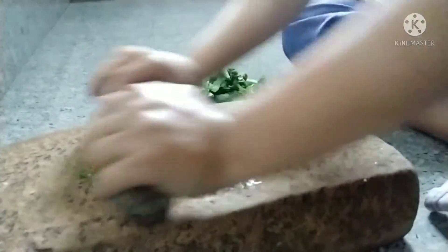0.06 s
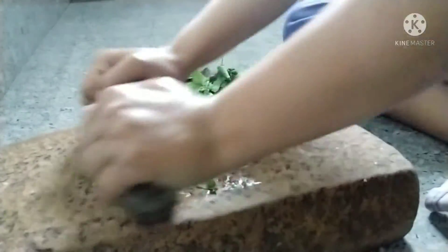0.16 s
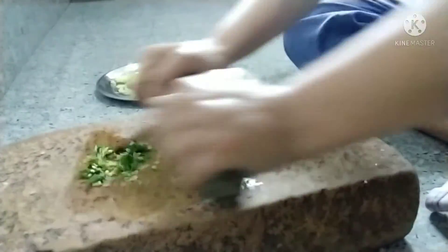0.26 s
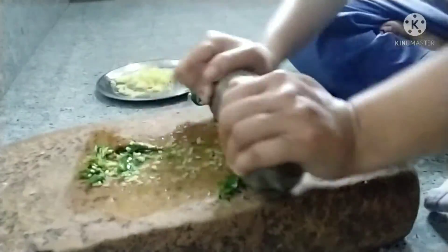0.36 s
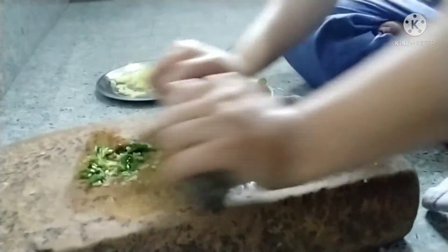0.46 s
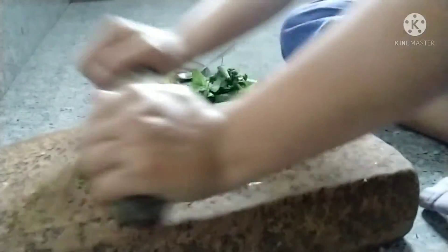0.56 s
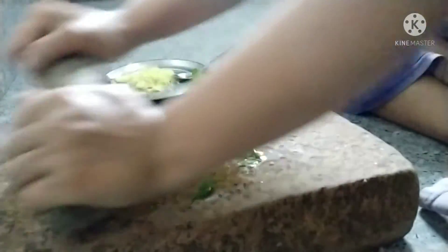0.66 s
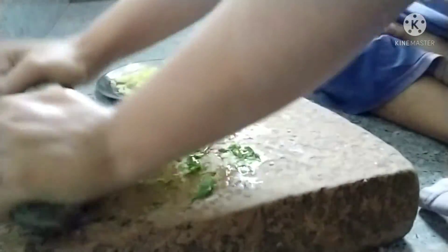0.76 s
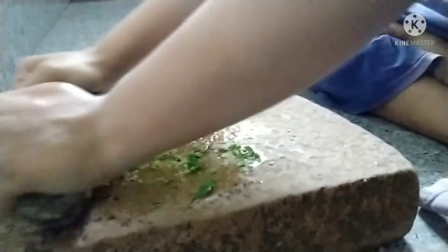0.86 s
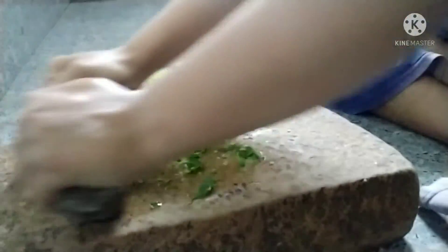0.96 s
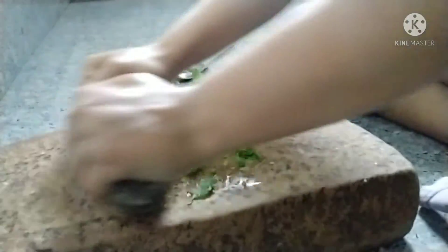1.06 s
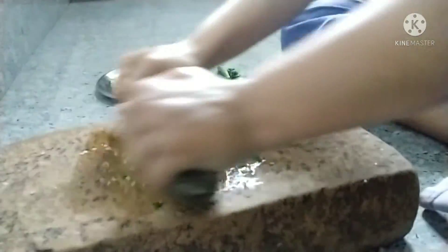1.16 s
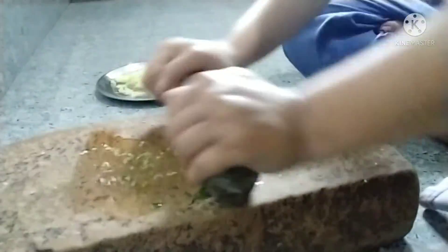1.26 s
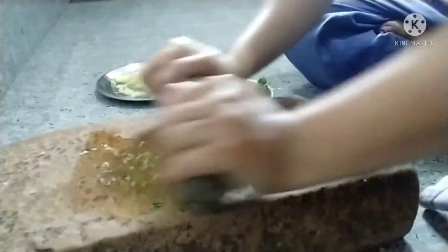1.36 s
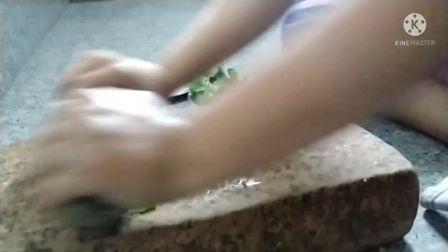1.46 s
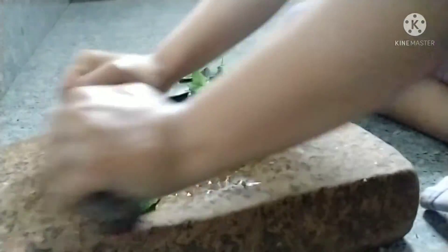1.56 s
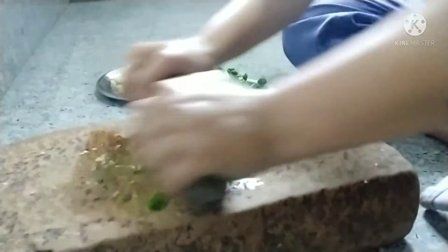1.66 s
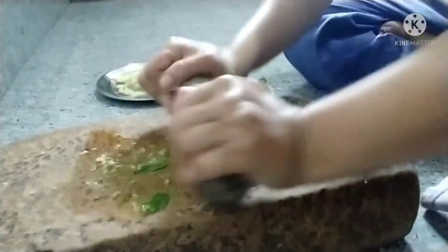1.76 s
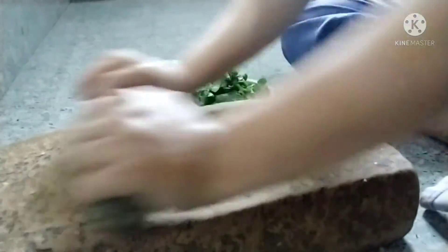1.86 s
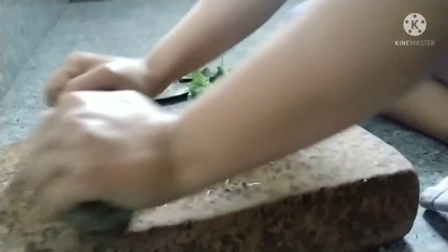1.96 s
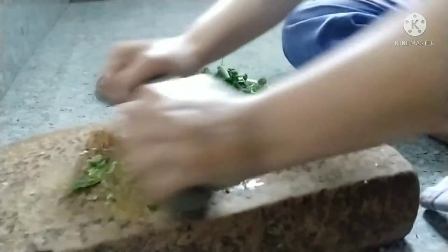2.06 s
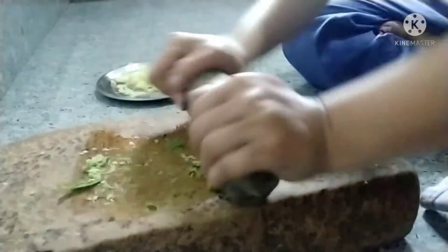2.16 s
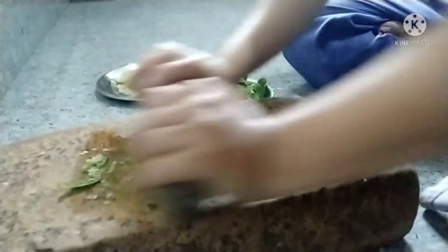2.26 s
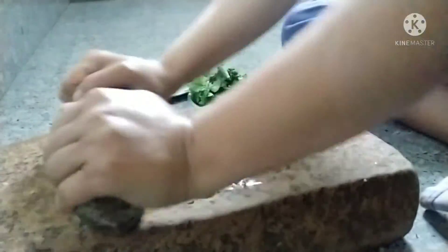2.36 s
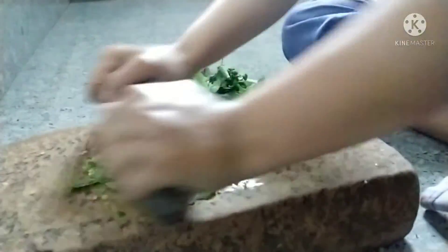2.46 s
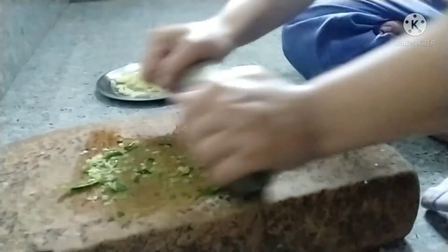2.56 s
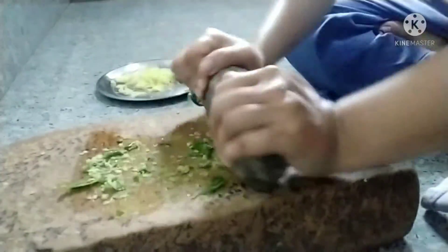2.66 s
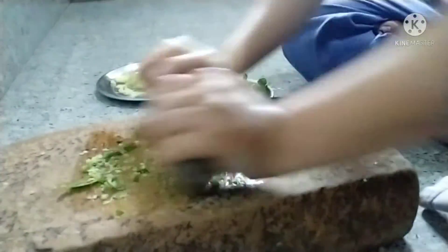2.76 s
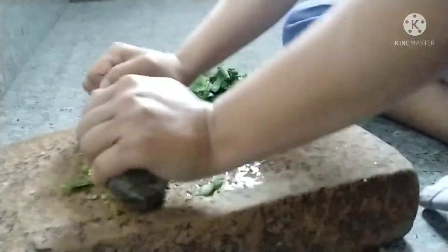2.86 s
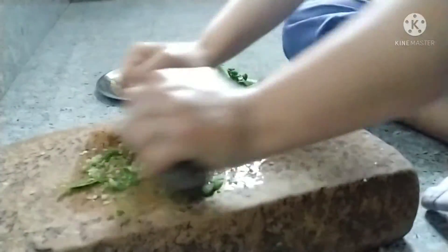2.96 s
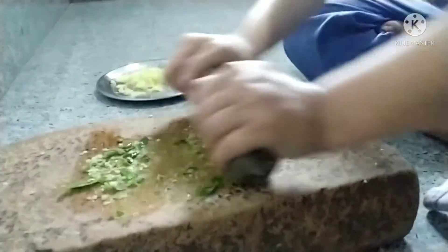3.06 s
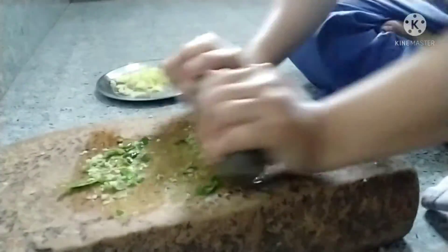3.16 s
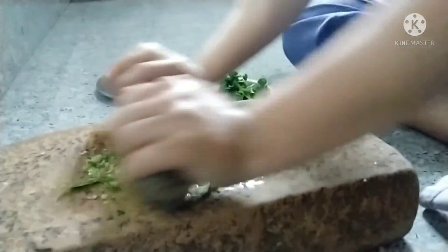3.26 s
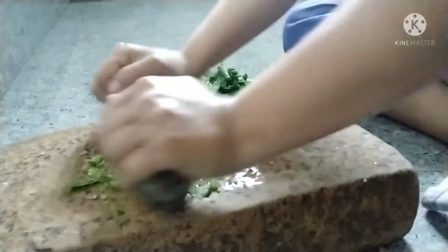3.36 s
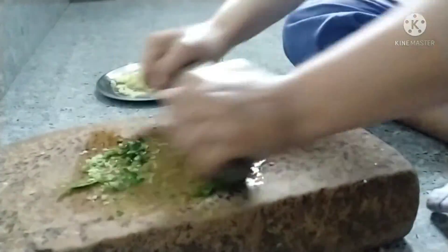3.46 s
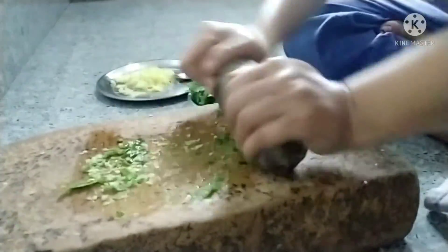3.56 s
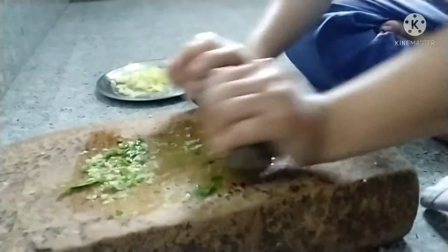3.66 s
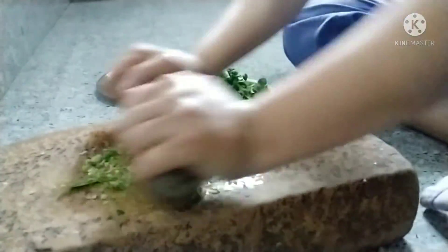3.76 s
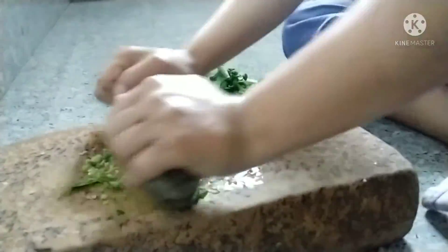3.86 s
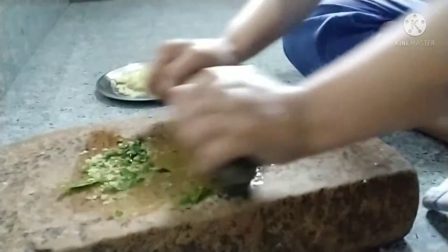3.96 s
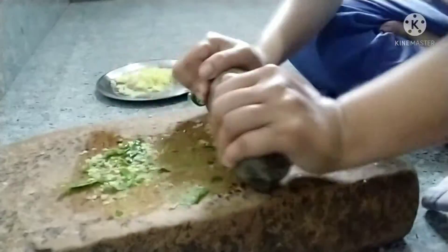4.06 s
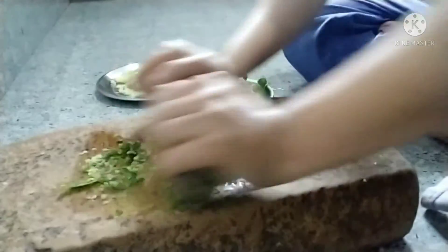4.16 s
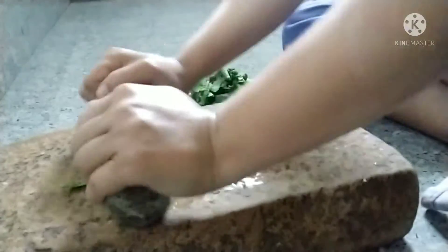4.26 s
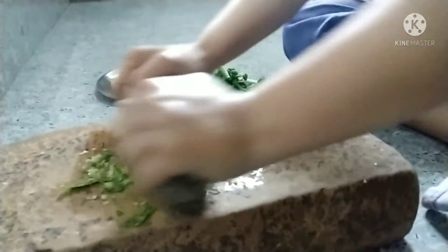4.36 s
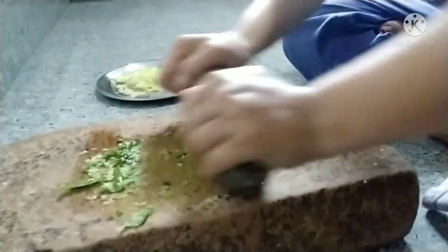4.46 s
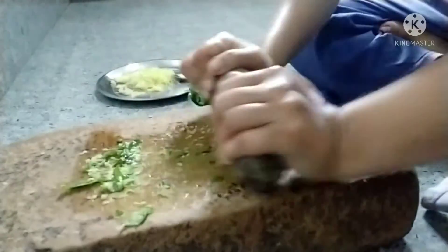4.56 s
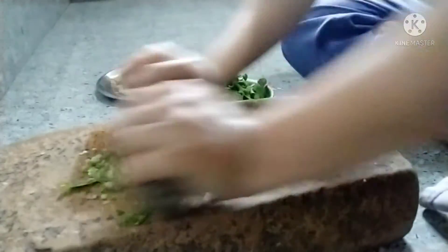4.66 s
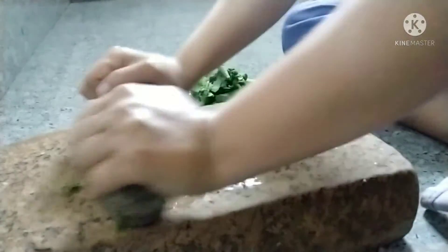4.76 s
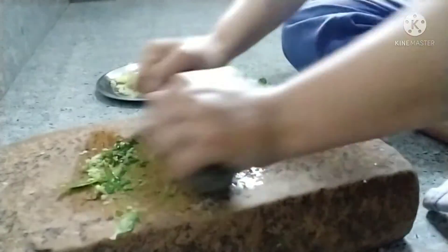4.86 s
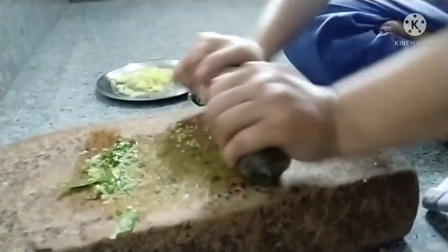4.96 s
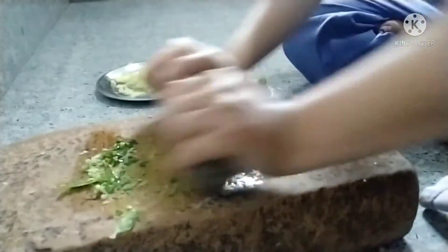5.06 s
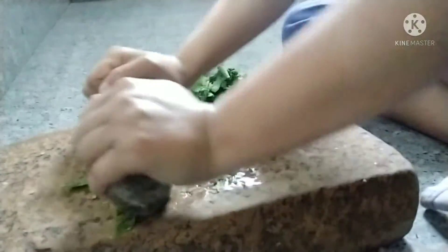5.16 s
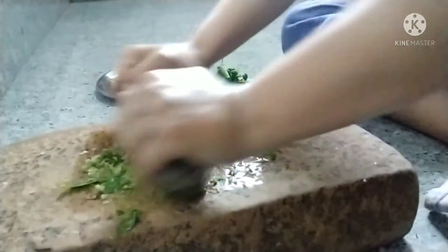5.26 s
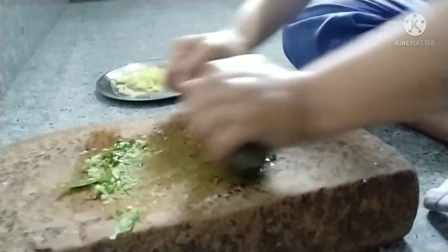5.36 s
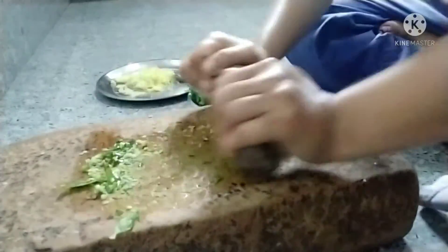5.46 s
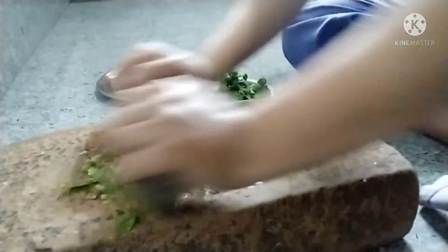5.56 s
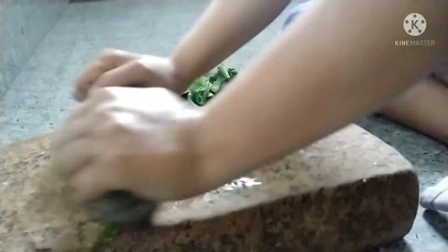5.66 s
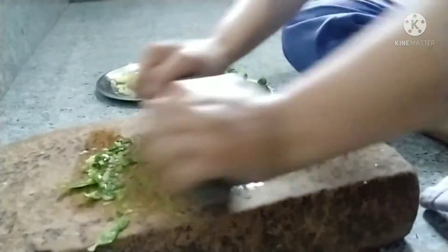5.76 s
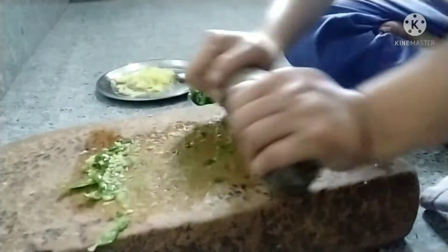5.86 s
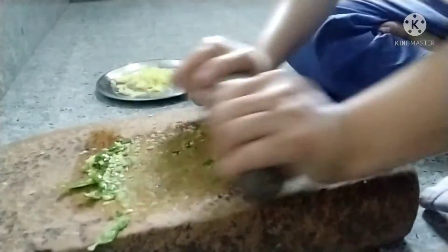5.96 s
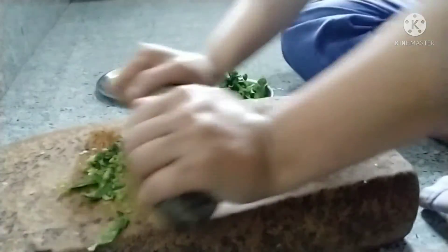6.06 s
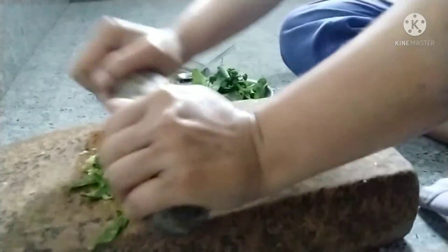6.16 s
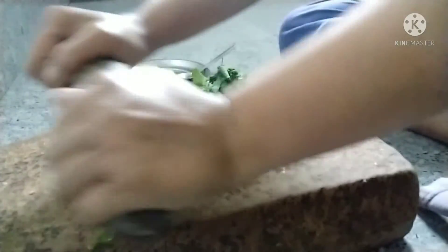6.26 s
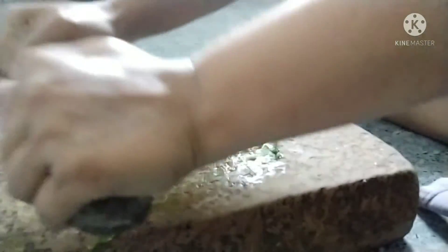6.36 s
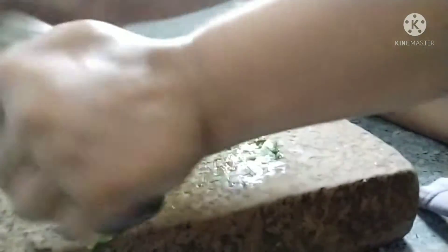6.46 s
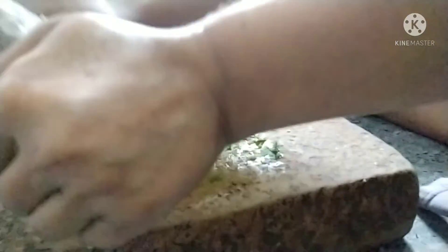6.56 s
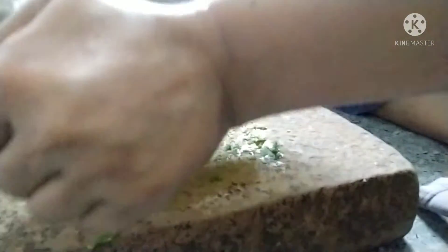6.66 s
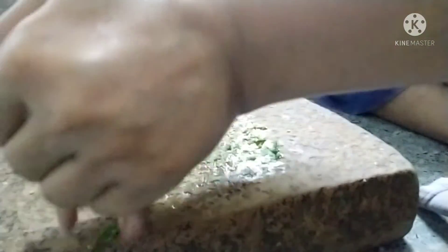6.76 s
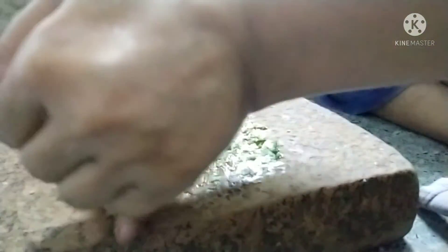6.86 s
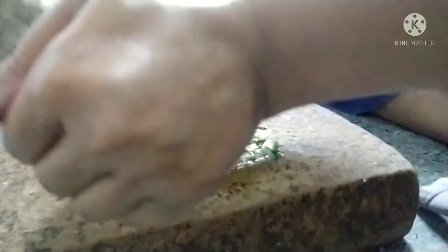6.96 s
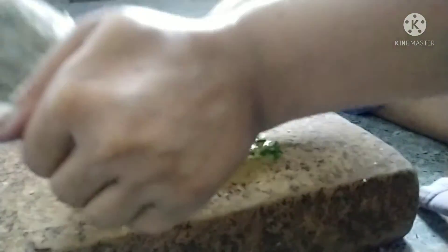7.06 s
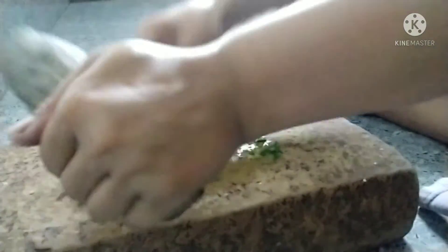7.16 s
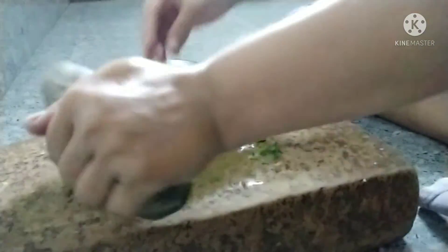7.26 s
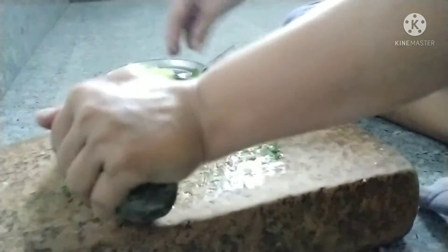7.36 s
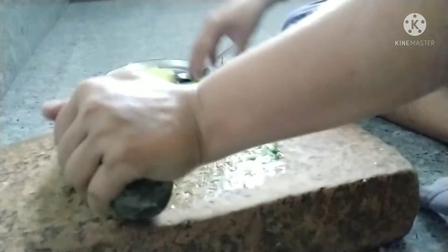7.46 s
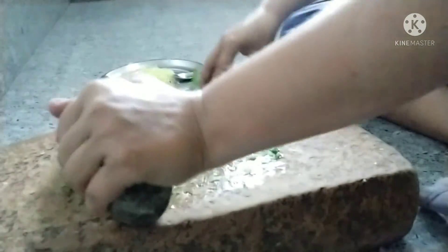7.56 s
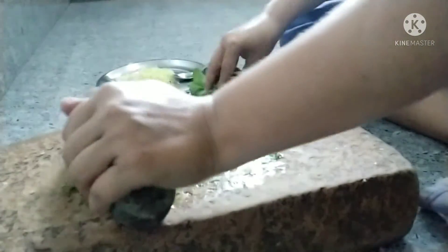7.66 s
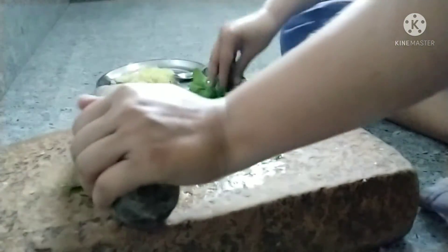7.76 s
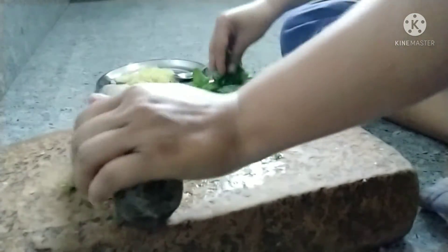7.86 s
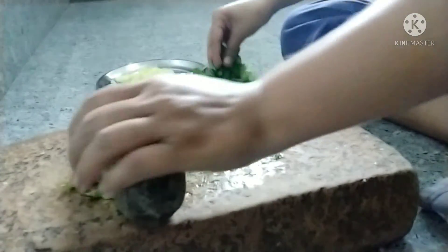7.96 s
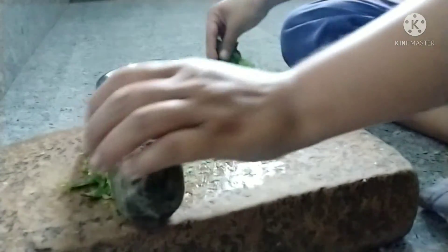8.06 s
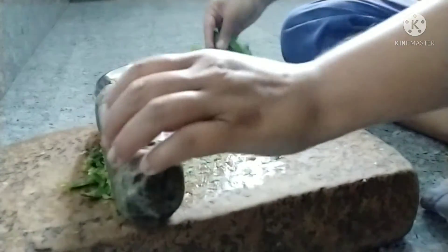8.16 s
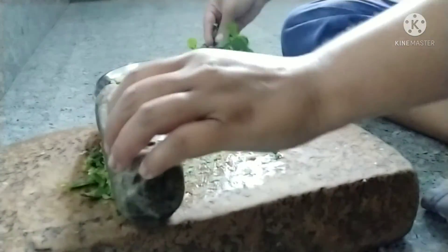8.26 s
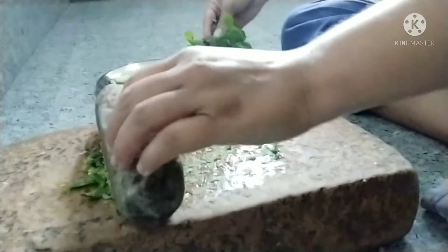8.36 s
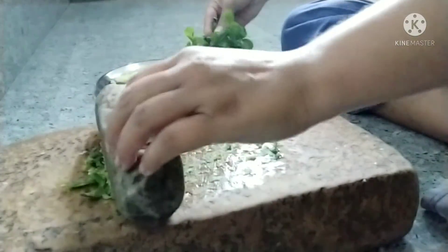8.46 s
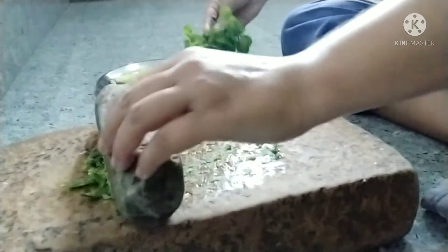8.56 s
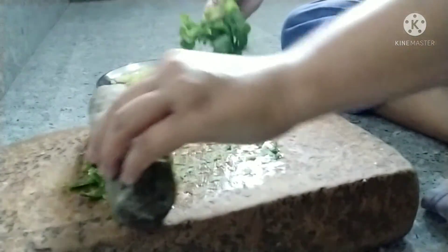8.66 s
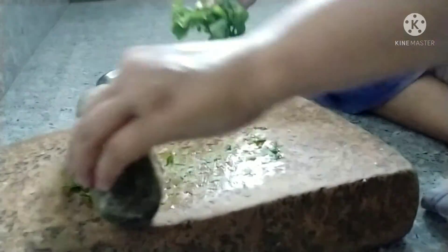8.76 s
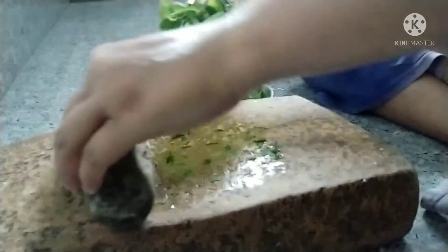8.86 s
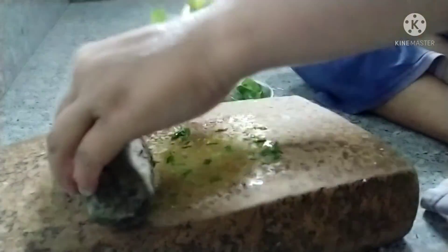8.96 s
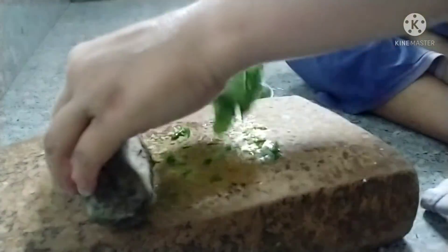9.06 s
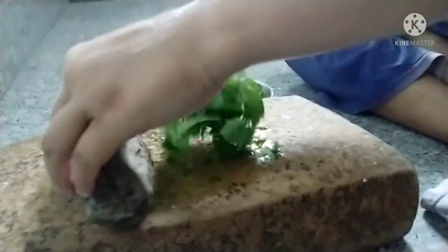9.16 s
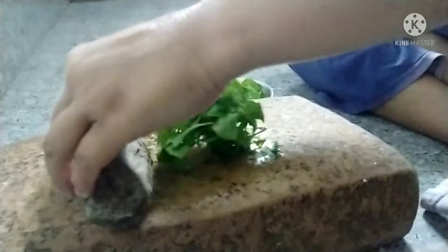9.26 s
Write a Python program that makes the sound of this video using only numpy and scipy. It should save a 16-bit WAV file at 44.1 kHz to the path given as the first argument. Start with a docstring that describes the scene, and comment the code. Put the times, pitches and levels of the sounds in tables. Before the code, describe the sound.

Close to the microphone in a small hard room, a heavy stone roller rubs back and forth over a gritty slab. Strokes come about twice a second, with clacking knocks, low hollow booms and a wet, bright fizz of crushed herbs. After about six seconds the roller rocks to rest in quickening soft taps, then leaves rustle faintly. A deep motor hum runs throughout.

```python
"""Grinding herbs on a stone slab

Wet herbs are ground on a stone slab on the floor of a small hard room, close to the microphone.
Grit and knocks ring the roller's modes, bumps and tips boom the slab, squeezed paste fizzes in random clicks.
The roller rocks to rest in soft taps and fresh leaves are picked up. A motor hums throughout."""
import sys
import numpy as np
from scipy import signal
from scipy.fft import rfft, irfft
from scipy.io import wavfile

SR = 44100
rng = np.random.default_rng(int(sys.argv[2]) if len(sys.argv) > 2 else 0)


def store_pcm(level_fs):
    """Save levels as 16-bit WAV."""
    pcm = np.round(np.clip(level_fs, -1, 1) * 32767).astype(np.int16)
    wavfile.write(sys.argv[1], SR, np.atleast_2d(pcm).T)


N = 411453
TIME = np.arange(N) / SR

# roller knocks on the slab: t/s, level/dB, bright ring re knock/dB, clack re knock/dB
KNOCKS = [(0.032, -15, -11, -18), (0.067, -15, 6.5, 9.5), (0.371, -34.5, 8, 1), (0.512, -12, -5, 1),
          (0.833, -6, -5, 2.5), (0.894, -18, -6, 10), (1.011, -22.5, -20, -3), (1.089, -25, -15.5, -19.5),
          (1.516, -21.5, 0, -9), (1.593, -15, 1.5, -12), (1.754, -13, 4.5, 0), (1.793, -14.5, 1.5, 1.5),
          (2.175, -29, 7, 0), (2.248, -26, -5, -8), (2.603, -29.5, 3, 6), (2.708, -16, -3, -5),
          (2.74, -30, -13, -11), (2.824, -20.5, 3, -16), (3.257, -21, -6, -7), (3.327, -18, -7, -2),
          (3.559, -21, 7.5, -9), (3.619, -17.5, 2, 0), (3.764, -17.5, 0, -8), (3.899, -26.5, 3, 1),
          (4.085, -22.5, 0.5, -2), (4.497, -30.5, 3, -3), (4.52, -27, 2, 1), (4.554, -24, 5, 3),
          (4.569, -25, 4, -7), (4.713, -29, -16, -14), (4.747, -29, -9, -14), (4.957, -24, -4, -13),
          (5.01, -25, 2, -7), (5.131, -25.5, -9, -13), (5.168, -24, -16, -12), (5.427, -21, -6, 1),
          (5.606, -27.5, -21, -20), (5.876, -24.5, -0.5, 1), (5.921, -14.5, 4, 3), (5.951, -15, 3, -2)]
# soft taps, mostly quickening and weakening, as the roller rocks to rest: t/s, level/dB
TAPS = [(6.3119, -27.5), (6.3694, -24.5), (6.438, -26.5), (6.4974, -27.5), (6.5512, -31), (6.598, -32),
        (6.641, -31.5), (6.679, -37), (6.713, -43), (6.74, -44), (6.776, -41)]

ROLL_START_S = 6.292   # the last, free roll


def from_db(db):
    """Decibels to gain."""
    return np.exp(np.asarray(db) * (np.log(10) / 20))


def rms_one(x):
    """Scale to rms 1."""
    return x / np.sqrt(np.mean(x ** 2) + 1e-20)


def at_hz(points, hz):
    """Read a table on a log-frequency axis."""
    f, value = np.transpose(points)
    return np.interp(np.log(np.maximum(hz, 1)), np.log(f), value)


def gain(rows):
    """A dB curve as a gain per sample."""
    return from_db(np.interp(TIME, *np.transpose(rows)))


def drift(knots_per_s):
    """Random curve: straight lines between normal knots of spread 1."""
    knots = rng.standard_normal(N // 20)
    return np.interp(TIME * knots_per_s, np.arange(len(knots)), knots)


def butter(x, hz, kind, order=2):
    """Butterworth filter."""
    return signal.sosfilt(signal.butter(order, hz, kind, fs=SR, output="sos"), x + 1e-18)


def convolve(x, response):
    """Pass sound through a response, channel by channel."""
    return signal.fftconvolve(np.atleast_2d(x), np.atleast_2d(response), axes=1)[:, :N]


def colour(spectrum, size=4096):
    """Causal (minimum-phase) response with the spectrum's shape; peak sample 1."""
    level_db = at_hz(spectrum, np.fft.rfftfreq(size, 1 / SR))
    cepstrum = irfft(np.log(from_db(level_db)))
    cepstrum[1:size // 2] *= 2
    cepstrum[size // 2 + 1:] = 0
    response = irfft(np.exp(rfft(cepstrum)))
    return response / np.abs(response).max()


def grains(per_s, spread_db):
    """Random clicks of uneven size; mean power about 1 at any rate."""
    size_db = spread_db * np.minimum(rng.exponential(1, N), 4)
    sizes = rms_one(from_db(size_db)) * rng.choice([-1, 1], N)
    chance = np.clip(per_s / SR, 1 / SR, 1)
    return sizes * (rng.random(N) < chance) / np.sqrt(chance)


def blows(events, crunch, crunch_s):
    """A click per event plus a brief crumble of noise that swells and dies."""
    force, t = np.zeros(N + SR), TIME[:SR // 20]
    for s, db in events:
        crumble = rng.standard_normal(len(t)) * t * np.exp(-t / crunch_s)
        blow = crunch * crumble / np.linalg.norm(crumble)
        blow[0] += 1
        at = int(s * SR)
        force[at:at + len(t)] += from_db(db) * blow
    return force[:N]


def swell(start_s, length_s, attack_s, sag_db_per_s, release_db_per_s):
    """Gain of one movement: rounded attack, sagging hold, release; cut 2 s after its start."""
    out, near = np.zeros(N), slice(*np.searchsorted(TIME, [start_s, start_s + 2]))
    t = TIME[near] - start_s
    attack = np.sin(np.pi / 2 * np.minimum(t / attack_s, 1)) ** 2
    out[near] = attack * from_db(-sag_db_per_s * t - release_db_per_s * np.maximum(t - length_s, 0))
    return out


def ringing(modes, rubbing, hits, patchy_db, wander):
    """A body rung by rubbing and hits (one force per mode); rubbing shares and mode pitches wander."""
    t, whole = TIME[:SR], 0
    for k, (hz, db, t60) in enumerate(modes):
        whole = whole + (-1) ** k * from_db(db - 60 * t / t60) * np.sin(2 * np.pi * hz * t)
    # rubbing is scaled by the response's energy, hits by its peak
    rubbing, peak, out = rubbing / np.linalg.norm(whole), np.abs(whole).max(), 0
    for k, ((hz, db, t60), hit) in enumerate(zip(modes, hits)):
        force = rubbing * from_db(patchy_db * drift(18)) + hit / peak + 1e-18
        # shift the mode down to 0 Hz, let it decay there, shift it back
        turn = np.exp(2j * np.pi * hz / SR * np.cumsum(1 + wander * drift(14)))
        ring = signal.lfilter([1], [1, -from_db(-60 / (t60 * SR))], force * turn.conj())
        out = out + (-1) ** k * from_db(db) * (ring * turn).imag
    return out


def in_room(x, wet_db, left_db, lead_s=0., wet_left_db=0.):
    """Direct sound, louder and earlier at the left, plus a diffuse tail with its own decay per band."""
    # reverberation: f/Hz, t60/s
    room_t60 = [(200, 0.27), (400, 0.54), (750, 0.59), (1400, 0.27), (4000, 0.19), (9000, 0.17),
                (16000, 0.0083)]
    t, tail = TIME[:SR], 0
    edges, white = np.geomspace(100, 17000, 12), rng.standard_normal((2, 2, SR))
    for k, (low, high) in enumerate(zip(edges, edges[1:])):
        decay = from_db(-60 * t / at_hz(room_t60, np.sqrt(low * high)))
        tail = tail + butter(white[k % 2], [low, high], "band") * decay
    tail = tail * np.clip((t - .003) / 0.0004, 0, 1)   # starts after 3 ms
    tail /= np.linalg.norm(tail, axis=1, keepdims=True)
    x, sides = np.ravel(x), np.array([[.5], [-.5]])
    direct = np.array([x, np.roll(x, round(lead_s * SR))])
    return direct * from_db(left_db * sides) + from_db(wet_db + wet_left_db * sides) * convolve(x, tail)


def roller():
    """Juddering grit and knocks ring the same stone modes; a knock starts with a dry crack."""
    # roller against slab: f/Hz, level/dB, t60/s
    stone_modes = [(760, 1.5, 0.0069), (841.7, -14, 0.096), (1053, -3, 0.025), (1102, -1.5, 0.039),
                   (1180, -3, 0.018), (1543, -7.5, 0.03), (1645, -7, 0.025), (1677, -9.5, 0.076),
                   (1741, -0.5, 0.014), (2058, -11, 0.032), (2250, -2.5, 0.0055)]
    # band of the dry crack of stone on stone: low f/Hz, high f/Hz
    crack_hz = [1010, 2090]
    grit = from_db(-6.5) * grains(per_s=1500, spread_db=2.5) * strokes("grit", contact_db=-51) * judder()
    hits = [knocking(hz) for hz, db, t60 in stone_modes]
    stone = butter(ringing(stone_modes, grit, hits, patchy_db=1.5, wander=0.0096), 480, "high")
    cracking = blows([(s, db) for s, db, ring, clack in KNOCKS], crunch=0.55, crunch_s=0.00066)
    crack = from_db(16.5) * butter(cracking, crack_hz, "band", order=4)
    return in_room(stone, wet_db=-5.0, left_db=1.1, lead_s=0.00013) + crack


def knocking(hz):
    """Force of all knocks on one mode: the point struck sets its ring and clack; taps land softly."""
    # top of low modes, both ends of the bright ring, start of the clack: f/Hz
    ring_hz = [1250, 1550, 1670, 1950]
    hits = [(s, db + np.interp(hz, ring_hz, [0, ring, ring, clack])) for s, db, ring, clack in KNOCKS]
    # little force above the cutoffs
    hard = butter(blows(hits, crunch=.25, crunch_s=.002), 2390, "low", order=5)
    soft = butter(blows(TAPS, crunch=.15, crunch_s=.002), 1750, "low", order=7)
    return hard + soft


def judder():
    """The roller catches on a pit, then slides on: uneven sudden steps that die quickly; rms 1."""
    judders_per_s, decay_s, spread_db, floor = 55, 0.004, 4, 0.34
    gap, size = rng.standard_normal((1500, 2)).T
    starts = np.append(0, np.cumsum(from_db(3.5 * gap) / judders_per_s))
    last = np.searchsorted(starts, TIME, side="right") - 1
    return rms_one(floor + from_db(spread_db * size[last]) * np.exp((starts[last] - TIME) / decay_s))


def strokes(layer, contact_db):
    """Gain of the grit or rumble: the strongest of pushes, pulls and the contact between them."""
    # roller pushed forward: start t/s, length/s, grit level/dB, rumble level/dB
    forward = [(0.08, 0.18, -34, -31.5), (0.508, 0.37, -33, -33), (1.04, 0.24, -34.5, -33),
               (1.522, 0.11, -39, -24), (1.89, 0.36, -39, -31), (2.335, 0.26, -39.5, -30.5),
               (2.82, 0.11, -41, -25.5), (3.255, 0.084, -36, -27.5), (3.775, 0.06, -34, -22.5),
               (4.24, 0.1, -54, -35.5), (4.71, 0.11, -42.5, -30), (5.125, 0.098, -42, -29.5),
               (5.612, 0.1, -42.5, -30.5), (6.075, 0.091, -41.5, -38)]
    # drawn back over nearly bare stone: start t/s, length/s, grit level/dB, rumble level/dB
    back = [(0.0, 0.068, -25, -22), (0.335, 0.052, -42, -37), (0.715, 0.05, -35, -27),
            (0.92, 0.12, -42, -33), (1.755, 0.1, -38, -32.5), (2.18, 0.12, -32, -31.5),
            (2.595, 0.19, -33.5, -35.5), (3.07, 0.1, -47.5, -40), (3.53, 0.37, -35, -30.5),
            (4.06, 0.16, -52, -38.5), (4.49, 0.12, -37.5, -35), (4.95, 0.1, -35.5, -35),
            (5.375, 0.18, -35.5, -33), (5.87, 0.17, -32, -31.5)]
    column = 2 + ["grit", "rumble"].index(layer)
    level = contact(contact_db)
    for rows, shape in ((forward, push), (back, pull)):
        for row in rows:
            level = np.maximum(level, from_db(row[column]) * shape(row[0], row[1]))
    return level


def push(start_s, length_s):
    """Weight on the roller during a push: lands at once, then eases."""
    return swell(start_s, length_s, attack_s=0.0088, sag_db_per_s=42, release_db_per_s=42)


def pull(start_s, length_s):
    """Weight on the roller on the way back."""
    return swell(start_s, length_s, attack_s=0.016, sag_db_per_s=19, release_db_per_s=171)


def contact(db):
    """Gain of the roller's light touch between strokes, fading once the grinding ends."""
    grind_end_s, stop_db_per_s = 6.32, 41
    return from_db(db - stop_db_per_s * np.maximum(TIME - grind_end_s, 0))


def slab():
    """The roller bumps over the pitted face and rocks the slab, which booms on the floor."""
    # slab and floor: f/Hz, level/dB, t60/s
    slab_modes = [(137, -37, 0.89), (202.8, -3, 0.15), (225.4, -13, 0.84), (277.8, 0, 0.18),
                  (324.7, 2, 0.2), (346.3, 11.5, 0.023), (364, -9, 0.48), (385.5, -4.5, 0.075),
                  (446.5, -12, 0.4), (520, 0, 0.023), (687, -16.5, 0.15), (705, -6.5, 0.063)]
    tap_thud_db = 20.5   # thud above the tap's knock
    free_roll = swell(ROLL_START_S, length_s=0.16, attack_s=0.0084, sag_db_per_s=5, release_db_per_s=29)
    rumble = strokes("rumble", contact_db=-45) + from_db(-30) * free_roll
    bumps = from_db(-2.5) * grains(per_s=700, spread_db=2.5) * rumble
    tips = rebounds(count=3) + [(s, db + tap_thud_db) for s, db in TAPS]
    rocking = blows(tips, crunch=.2, crunch_s=.005)
    thuds = from_db(-20.0) * butter(rocking, 510, "low")
    boom = ringing(slab_modes, bumps, [thuds] * len(slab_modes), patchy_db=2.0, wander=0.0023)
    boom = butter(butter(boom, 142, "high"), 775, "low", order=5)
    boom = in_room(boom, wet_db=-12.0, left_db=10.5, wet_left_db=3.0)
    middle = boom.mean(axis=0)
    # the longest waves reach both channels alike; second high-pass runs backwards in time
    apart = butter(boom - middle, 256, "high")
    apart = butter(apart[:, ::-1], 280, "high")[:, ::-1]
    return middle + apart


def rebounds(count):
    """Each tip of the slab, as the weight shifts, is a short run of thuds, most of them dying."""
    # tips on the floor: t/s, level/dB, loss per rebound/dB
    tipping = [(0.015, -8, 11), (0.075, -14, -8), (0.515, 1, 26), (0.733, 2, 9), (0.803, 5.5, 3),
               (1.531, -6.5, -4.5), (1.796, 1.5, 23), (2.833, 7, 9), (3.268, 4.5, 9), (3.62, -4.5, 17),
               (3.762, 10, 3), (5.922, -0.5, 7), (6.297, -4, 25), (6.315, 2.5, 13)]
    rebound_s = .046
    return [(s + rebound_s * k, db - loss_db * k) for s, db, loss_db in tipping for k in range(count)]


def paste():
    """Tiny films of juice burst all along the roller, thicker, faster and brighter under pressure."""
    # fizz colour: f/Hz, relative level/dB
    fizz_spectrum = [(1290, 0.5), (2200, -1), (2700, -0.5), (4200, 4.5), (5150, 3.5), (5820, -0.5),
                     (6020, 3), (7580, 8.5), (10500, 10.5), (11500, 9.5), (13000, 7), (15300, 2),
                     (15900, 0)]
    burst, out = colour(fizz_spectrum), 0
    burst_norm = np.linalg.norm(burst)
    squeeze = pressure() * from_db(2 * drift(55))   # lumps in the paste
    effort = squeeze / squeeze.max()
    for lead_s in np.linspace(.0002, .00046, num=3):   # three places along the roller
        clumps = from_db(2.4 * drift(120))
        crackle = grains(600 + 2500 * effort, spread_db=-1.5) * squeeze * clumps / burst_norm
        crackle = from_db(-11.0) * convolve(crackle, burst)
        # hard pressure breaks the films finer, at the top of the fizz
        crackle = crackle + 0.061 * effort * butter(crackle, [7000, 12000], "band", order=1)
        out = out + in_room(crackle, wet_db=-1.5, left_db=9.5, lead_s=lead_s, wet_left_db=-3.5)
    ticks = from_db(-13.0) * squeeze * tonal_ticks(per_s=60, cycles=30)
    out = out + in_room(ticks, wet_db=-9, left_db=13.5, lead_s=.0003)
    # coarse grains catch now and then and scratch
    scratches = grains(per_s=100, spread_db=-2.0) * squeeze * from_db(2.6 * drift(70)) / burst_norm
    scratches = from_db(-12) * butter(convolve(scratches, burst), 7000, "low", order=1)
    out = out + in_room(scratches, wet_db=-4, left_db=8.0, lead_s=.0003)
    return wandering(out, patchy_db=2.6, count=9)


def pressure():
    """Gain of the fizz: the strongest of squeezes, smears and the contact between them."""
    # pushes squeeze the paste: greatest pressure t/s, level/dB, rise/s, fall/s
    squeezes = [(0.16, -28.5, 0.083, 0.035), (0.61, -35, 0.052, 0.046), (1.56, -31.5, 0.044, 0.04),
                (1.96, -32.5, 0.045, 0.057), (2.431, -33.5, 0.049, 0.046), (2.922, -33, 0.056, 0.044),
                (3.369, -33.5, 0.073, 0.046), (3.864, -31.5, 0.065, 0.042), (4.297, -32, 0.034, 0.054),
                (4.797, -32.5, 0.053, 0.039), (5.216, -32, 0.042, 0.054), (5.685, -31, .042, 0.044),
                (6.154, -35.5, 0.054, 0.047)]
    # between pushes it smears and peels off the roller: start t/s, length/s, level/dB
    smears = [(0.0, .06, -50), (0.295, 0.19, -40.5), (1.078, 0.27, -42), (1.354, 0.051, -57.5),
              (1.688, 0.15, -43.5), (2.095, 0.15, -43.5), (2.527, 0.072, -42), (2.615, 0.068, -46.5),
              (3.028, 0.23, -44.5), (3.471, 0.17, -44), (4.002, 0.13, -43), (4.424, .13, -46),
              (4.892, 0.1, -43), (5.356, .23, -45.5), (5.8, 0.15, -44.5)]
    level = contact(-56)
    for centre_s, db, rise_s, fall_s in squeezes:
        level = np.maximum(level, from_db(db) * squeezing(centre_s, rise_s, fall_s))
    for start_s, length_s, db in smears:
        smear = swell(start_s, length_s, attack_s=0.024, sag_db_per_s=11.5, release_db_per_s=154)
        level = np.maximum(level, from_db(db) * smear)
    return level


def squeezing(centre_s, rise_s, fall_s):
    """Pressure on the paste builds up to its peak during a push and lets go."""
    fall_db = 12.5   # per rise or fall time, far from the peak
    off_centre = (TIME - centre_s) / np.where(TIME < centre_s, rise_s, fall_s)
    return from_db(-fall_db * (np.hypot(1, off_centre) - 1))


def tonal_ticks(per_s, cycles):
    """Sparse random clicks through nine narrow resonances: short tonal ticks in the fizz; rms 1."""
    out = 0
    for hz in np.geomspace(6800, 12500, num=9):
        resonance = signal.iirpeak(hz, max(cycles, 2), fs=SR)
        out = out + signal.lfilter(*resonance, grains(per_s, spread_db=5.0) + 1e-18)
    return rms_one(out)


def wandering(x, patchy_db, count):
    """Random slow gain per band: each fizz band swells and fades on its own."""
    edges = np.geomspace(4300, 15000, count + 1)
    for low, high in zip(edges, edges[1:]):
        x = x + (from_db(patchy_db * drift(28)) - 1) * butter(x, [low, high], "band", order=1)
    return x


def herbs():
    """Single sharp snaps, small random ticks in the paste, and the faint rustle of leaves."""
    # snap colour: f/Hz, relative level/dB
    snap_spectrum = [(700, -34), (2000, -4), (3000, -6), (4200, 2), (6000, 9), (7800, 11), (10500, 15),
                     (13000, 2), (16000, 4.5)]
    # leaves are handled: start t/s, length/s, level/dB
    touches = [(7.53, 0.062, -56.5), (7.77, 0.06, -66), (7.84, 0.091, -62.5), (8.03, 0.34, -73),
               (8.774, 0.07, -67.5)]
    crack = colour(snap_spectrum)
    crack_norm = np.linalg.norm(crack)
    handling = 0
    for start_s, length_s, db in touches:
        touch = swell(start_s, length_s, attack_s=0.028, sag_db_per_s=0, release_db_per_s=71)
        handling = handling + from_db(db) * touch
    rustle = grains(per_s=1500, spread_db=-1.0) * handling / crack_norm
    ticks = from_db(-44) * grains(per_s=64, spread_db=0.0) * np.sqrt(pressure()) / crack_norm
    ticks = ticks * (TIME < ROLL_START_S)
    sound = convolve(rustle + ticks + from_db(9) * snapping(), crack)
    return in_room(sound, wet_db=-9.0, left_db=12.5, lead_s=.00025, wet_left_db=-13.0)


def snapping():
    """Juice bubbles and stalks snap: a sharp click, part of which crumbles away over milliseconds."""
    # snaps: t/s, relative level/dB, power share that crumbles after the click/0-1
    snaps = [(0.031, -15.5, 0.7), (0.0517, -25, .6), (0.174, -18, .6), (0.3337, -40, 0.6),
             (0.5443, -21.5, .7), (0.6535, -36, .7), (1.2594, -41, 0.5), (1.275, -31, 0.6),
             (1.297, -31.5, 0.4), (1.8134, -36, .5), (1.9084, -18.5, 0.9), (2.2065, -29.5, 0.4),
             (2.3313, -18.5, .9), (2.4724, -16, 0.1), (2.684, -26, 1), (2.795, -28.5, 0.8),
             (2.8616, -27, 0.6), (2.8765, -24, 0.6), (3.2263, -30, 0.8), (3.314, -19, .7),
             (3.7361, -23.5, .7), (4.285, -29, .55), (4.667, -33, 0.95), (4.7307, -27.5, 0.8),
             (5.112, -30.5, 0.4), (5.153, -20, .5), (5.169, -33, .6), (5.2562, -31, .4), (5.309, -39, .5),
             (5.691, -29, .6), (5.9828, -43.5, .5), (6.0305, -32.5, 0.7), (6.161, -25, 0.4),
             (7.5373, -35, 0.7), (7.5391, -22, 0.7), (7.6986, -49, .4), (7.709, -47, .4), (7.943, -47, .5),
             (8.0403, -47, .5), (8.8006, -49, .6), (8.8489, -50, .6)]
    force, t = np.zeros(N + SR), TIME[:SR // 20]
    for s, db, share in snaps:
        share = np.clip(share, 0, 1)
        crumble = rng.standard_normal(len(t)) * t * np.exp(-t / 0.0012)
        snap = np.sqrt(share) * crumble / np.linalg.norm(crumble)
        snap[0] += np.sqrt(1 - share)
        at = int(s * SR)
        force[at:at + len(t)] += from_db(db) * snap
    return force[:N]


def motor():
    """A nearly pure hum, and a low rumble of narrow noise bands at the room's resonances."""
    # hum course: t/s, relative level/dB
    hum_course = [(0.0, -18), (0.12, -20.5), (1.2, -23), (2.42, -21.5), (2.78, -21.5), (3.29, -24),
                  (4.03, -22), (4.66, -23), (4.97, -21.5), (5.96, -21), (6.6, -23), (7.31, -24),
                  (7.95, -22.5), (9.15, -25)]
    # hum lines: multiple of the fundamental, relative level/dB
    hum_lines = [(1, -5.5), (4, -47), (5, -42.5)]
    # room resonances stirred by the rumble: f/Hz, width/Hz, relative level/dB
    resonances = [(89.8, 1.6, -55), (144.1, 8.3, -52), (195.4, 12.4, -54), (279, 41, -65.5)]
    hum_hz = 69.6
    phase = 2 * np.pi * np.cumsum(hum_hz + .1 * drift(2)) / SR
    lines = sum(from_db(db) * np.sin(round(k) * phase) for k, db in hum_lines)
    hum = gain(hum_course) * np.sqrt(2) * lines
    drone = 0
    for hz, width, db in resonances:
        band = butter(rng.standard_normal(N), [hz - width / 2, hz + width / 2], "band")
        drone = drone + from_db(db) * rms_one(band)
    return (hum + drone) * from_db([[.8], [-.8]])


def air():
    """Steady background noise, alike in both channels only in the bass."""
    # noise colour: f/Hz, relative level/dB
    air_spectrum = [(25, -26), (40, 2), (55, 0.5), (85, 7), (125, 1), (200, -14), (250, -12), (360, -11.5),
                    (570, -21.5), (1400, -24.5), (4300, -35), (9200, -37.5), (15500, -48)]
    shared, apart = rng.standard_normal((2, N))
    sides = butter(apart, 480, "high") * np.array([[1], [-1]])
    noise = convolve(shared + sides, colour(air_spectrum))
    # level is set on the part above 560 Hz
    return from_db(-61.5) * noise / np.std(butter(noise.mean(axis=0), 560, "high", order=6))


def scene():
    """Grinding and herbs over the motor and the background noise."""
    return roller() + slab() + paste() + herbs() + motor() + air()


def record(dry):
    """Steep low-pass at the top."""
    cutoff_hz = 15600
    return signal.sosfilt(signal.ellip(10, .2, 80, cutoff_hz, fs=SR, output="sos"), dry)


dry = scene()
out = record(dry)
store_pcm(out)
```